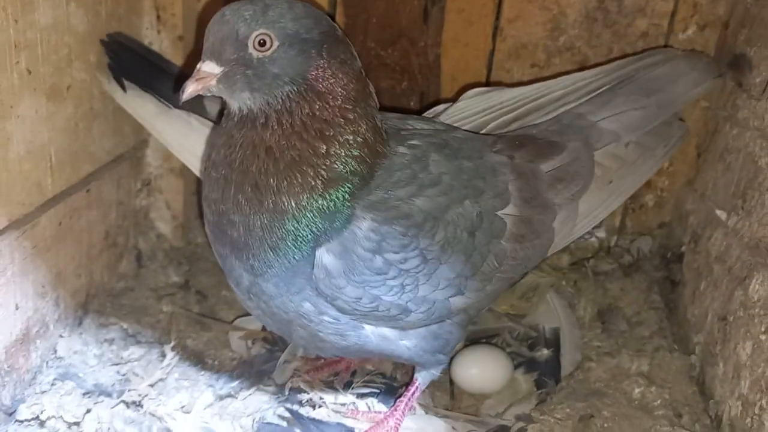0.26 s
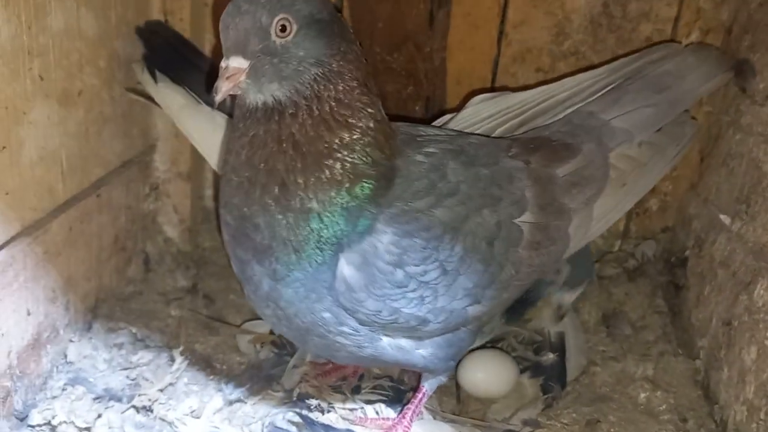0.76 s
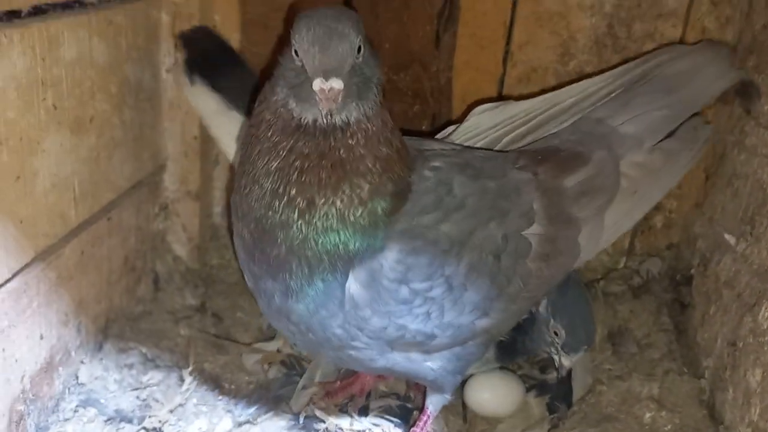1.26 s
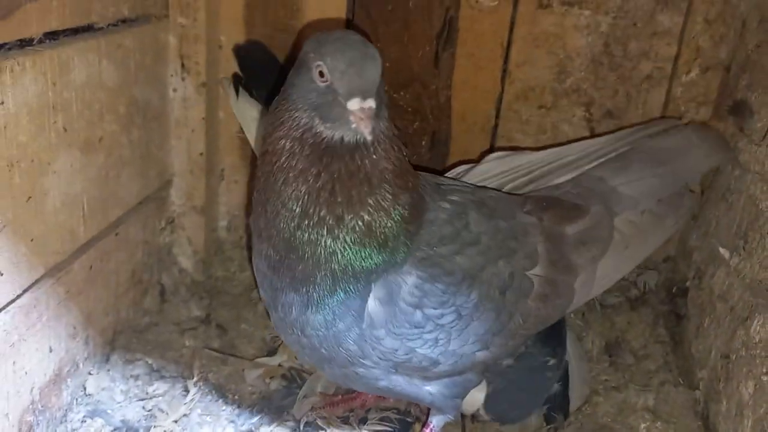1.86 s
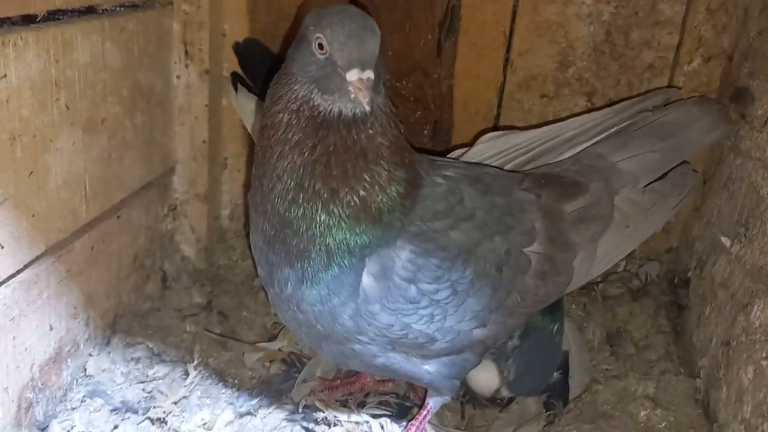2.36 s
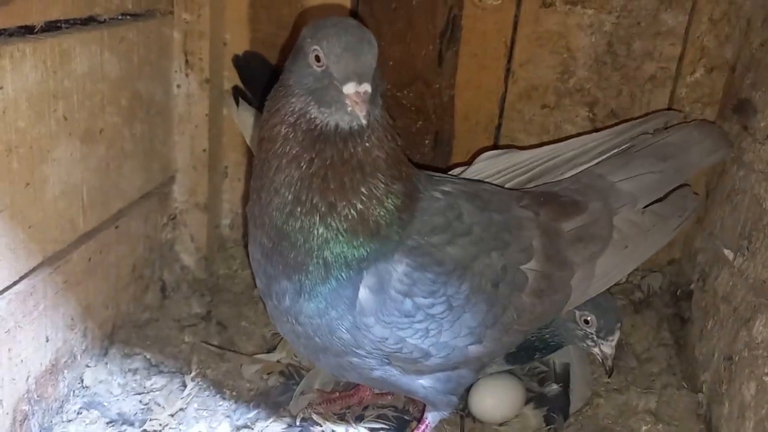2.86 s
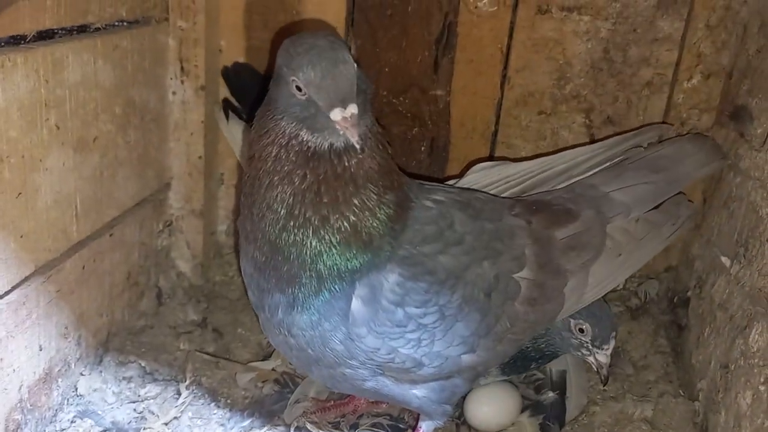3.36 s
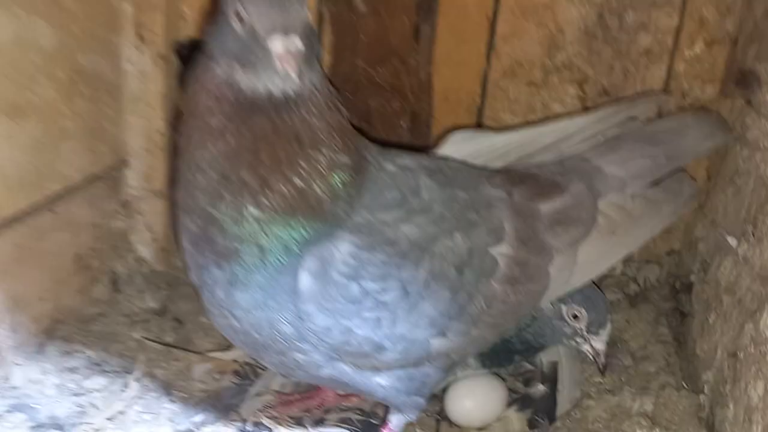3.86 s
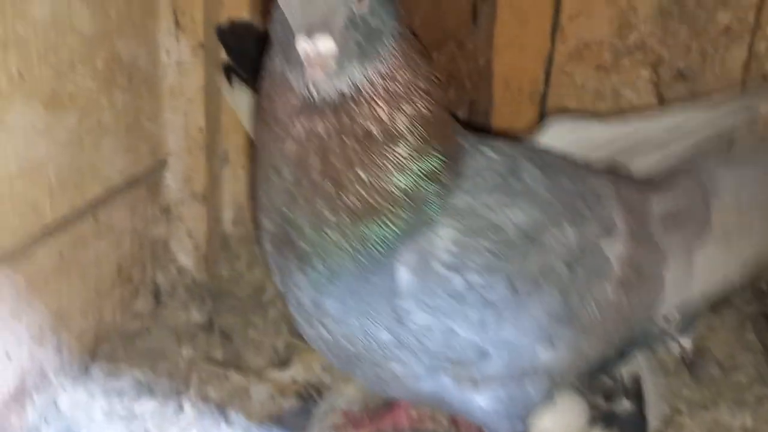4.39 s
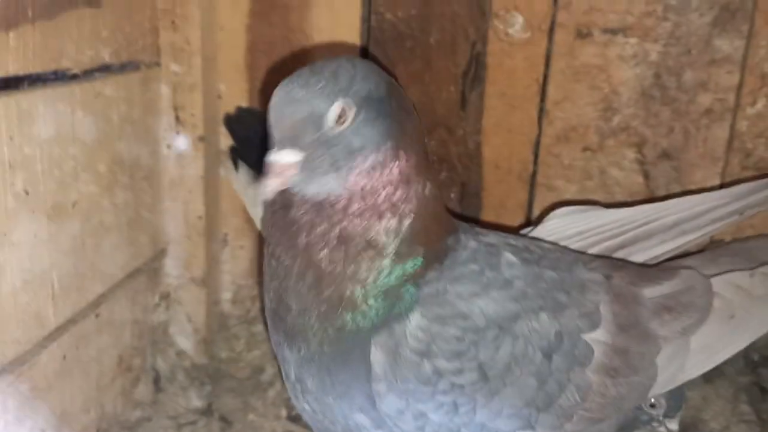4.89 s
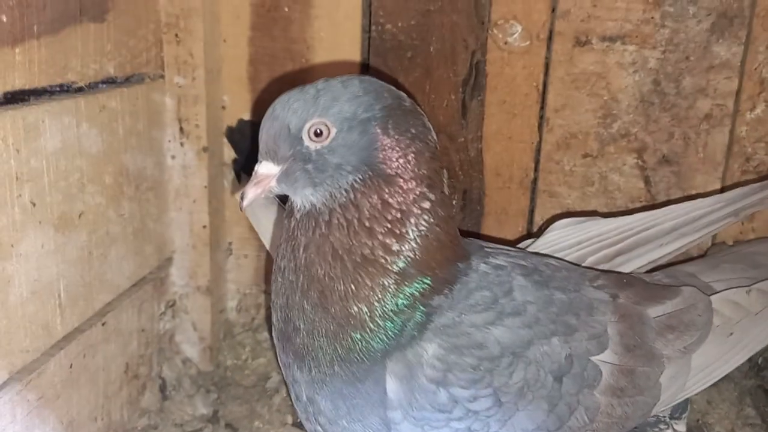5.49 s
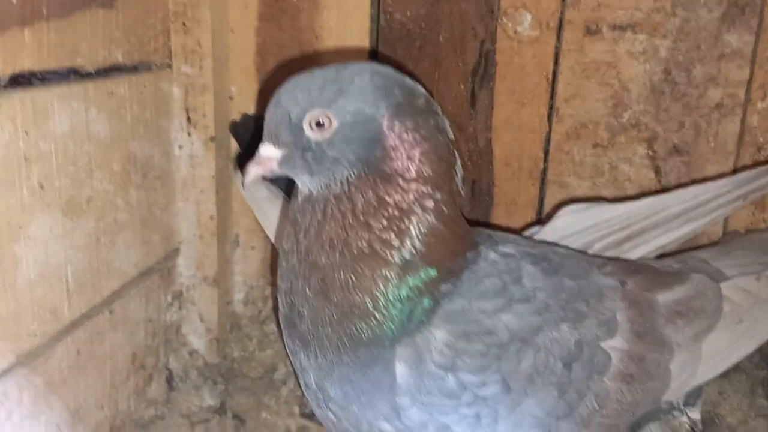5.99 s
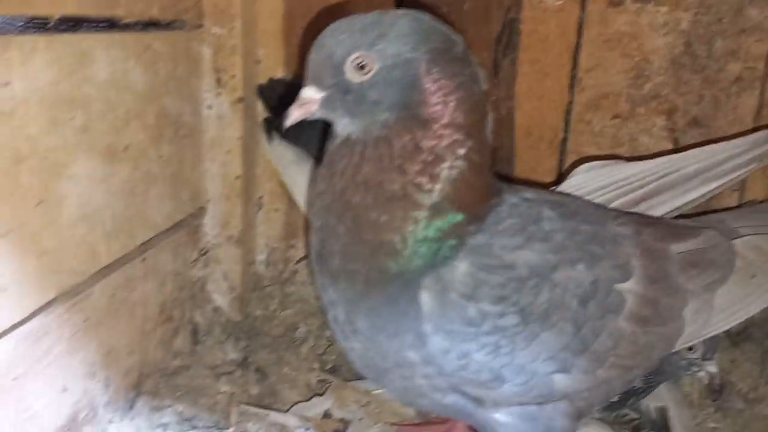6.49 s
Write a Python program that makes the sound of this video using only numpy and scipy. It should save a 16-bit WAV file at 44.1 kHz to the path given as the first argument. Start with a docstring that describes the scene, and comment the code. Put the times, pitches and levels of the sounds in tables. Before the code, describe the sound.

Inside a wooden pigeon loft, a nearby bird gives low, throaty, broken coos while others hum softly farther off. Feet and feathers rustle dry litter, with little ticks and straw snaps. Near the end a loud clack and a stumbling run of wooden thuds burst out, then settle into faint low rumble. Close microphone, sound almost entirely on the right.

```python
"""Pigeons coo in a wooden loft: gliding tones and octaves, roughened by rattle and hoarse noise.
Farther off, two wandering hums and a blurred noise band make the murmur of the flock.
Shaped noise rustles, ticks and crackles as feet and feathers stir the litter. Near the end something
knocks the nest box: noise snaps and ringing modes clack, pressure pulses thud in a stumbling run.
At the microphone nearly all sound is in the right channel; the left has a faint loft echo and hiss."""
import sys
import numpy as np
from scipy import signal
from scipy.fft import rfft, irfft, next_fast_len
from scipy.io import wavfile
from scipy.ndimage import uniform_filter1d, map_coordinates

SR = 44100
rng = np.random.default_rng(int(sys.argv[2]) if len(sys.argv) > 2 else 0)


def persist_wave(psi):
    """Save psi, clipped to +-1, as 16-bit WAV."""
    counts = np.round(np.clip(psi, -1, 1) * 32767).astype(np.int16)
    wavfile.write(sys.argv[1], SR, np.atleast_2d(counts).T)


N = 297234

# Levels are relative, before the gains in the functions; spectra give level per Hz.
# The coos, one list of points each: t/s, pitch f/Hz, fundamental level/dB, octave level/dB, rasp/0-1
COO_GLIDES = [
    [(-.02, 321.4, -67, -68, 1), (.09, 323.4, -62.5, -63.5, 0.75), (.125, 274.6, -75, -66, 0.2),
     (.15, 279.2, -64, -62.5, .3), (.2, 258, -72, -70, 0.26), (.245, 266.3, -64, -67, 0.75),
     (.29, 253.2, -52, -61, 0.5), (.34, 255.5, -53, -58, 0.2), (.36, 249.5, -64, -64, 0.6),
     (.39, 293, -61, -59, 0.5)],
    [(1.06, 350.4, -70.5, -78, 0.5), (1.085, 325.4, -64.5, -67, 0.24), (1.105, 273.6, -76, -65, 0.14),
     (1.13, 261, -70, -57, 0.02), (1.16, 250, -67, -62.5, 0.64), (1.195, 262.5, -73, -53.5, 0),
     (1.225, 258.3, -70, -55, 0.07), (1.245, 253, -72, -68, .2)],
    [(1.72, 255.6, -68, -65, .3), (1.79, 271.6, -61, -64, .4), (1.855, 307.8, -65, -66, .6),
     (1.885, 330.2, -67, -57.5, 0.44), (1.94, 346.5, -62, -59, 0.67), (1.972, 328.8, -70, -62.5, 0.4),
     (2.0, 332.6, -67, -58, .7), (2.04, 272.5, -64, -59, 0.67), (2.11, 272.7, -61, -58, 0.33),
     (2.15, 247, -68, -62.5, 0.34), (2.18, 251, -56, -61, 0.3)],
    [(2.188, 280.4, -57, -58, .6), (2.205, 299, -55, -54, 0.5), (2.22, 269.6, -58, -51, 0.14),
     (2.236, 249.7, -49.5, -54, 0.38), (2.252, 264, -50, -50, 0.1), (2.27, 237, -61, -59, 0.4)],
    [(2.28, 368, -76, -64, 0.5), (2.293, 430, -67, -60, 1), (2.308, 438, -73, -69, 1),
     (2.33, 490, -76, -78, 0.7)],
    [(2.803, 271.6, -59, -62, .4), (2.835, 315, -61, -72, .5), (2.865, 402, -71, -65.5, .5),
     (2.893, 414, -67, -61.5, 0.53), (2.925, 363, -76, -66, .7), (2.965, 370.7, -68, -67.5, 0.95),
     (3.01, 328, -70, -67.5, .7)],
    [(3.51, 270.5, -62, -66, 0.65), (3.6, 279.7, -69, -72, 1), (3.64, 279.5, -68, -65, 0.68),
     (3.668, 265, -69, -69, .5), (3.69, 304.7, -67, -61.5, 0.64), (3.715, 279.7, -70, -65.5, 0.9),
     (3.77, 335, -63.5, -65, 0.87), (3.797, 279, -66, -66.5, 0.4), (3.835, 373, -71, -65, 0.6)],
    [(3.848, 361.5, -61, -61, 0.4), (3.885, 398.3, -69, -64, 0.2), (3.905, 383, -60, -60.5, 0.62),
     (3.93, 426, -66, -62, 0.3), (3.952, 429.5, -65, -61, 0.57), (3.975, 367.4, -65, -63, 0.7),
     (4.015, 405, -69, -67, .3), (4.05, 380, -61, -73, .4)],
    [(5.072, 389, -57, -59, 0.7), (5.1, 360, -68, -68.5, 0.84), (5.16, 343, -82, -72, .4)],
    [(5.552, 354, -72, -56, .4), (5.585, 414, -69, -65.5, .3), (5.605, 375, -64, -56, 0.43),
     (5.63, 378, -60, -61, 0.3), (5.652, 402, -69, -61.5, 0.1), (5.677, 360.6, -59, -59, 1),
     (5.705, 370, -51, -74, 0.6)],
]
# Throat pulses within the coos: middle t/s, swell/dB
THROAT_PULSES = [(.008, 5), (.075, 3), (.152, 5.5), (1.79, 2), (1.828, 5), (1.888, 2.5), (1.939, 3.5),
                 (2.0, 4.5), (2.075, 7), (2.22, 2.5), (2.252, 5), (2.97, 1), (3.001, 6.5), (3.595, 4),
                 (3.638, 6.5), (3.693, 3.5), (3.742, 4), (3.772, 5), (3.803, 3.5), (3.828, 4.5), (3.957, 3),
                 (5.604, 4), (5.675, 4.5)]
# Hoarse band of the coos: f/Hz, level/dB
HOARSE_SPECTRUM = [(150, -31), (280, -7), (380, 3.5), (480, 8), (620, -1.5), (850, -54), (1100, -16.5),
                   (1350, -29.5), (2500, -62)]
PULSE_HALF_S, COO_EDGE_S = 0.0076, 0.0078  # pulse half width; fade at both ends of a coo
# At full rasp: flutter of the level, pitch jitter (share), rattle relative to the octave (share)
COO_THROB_DB, COO_JITTER, COO_RATTLE = 3.8, 0.04, 0.6

# Hums of birds farther off: start t/s, length/s, level/dB
FLOCK_HUMS = [(0.0, 0.12, -64), (0.57, 0.046, -58.5), (0.657, 0.073, -67), (0.813, 0.041, -61),
              (0.977, 0.033, -58.5), (1.193, 0.12, -65), (1.692, 0.24, -58), (2.002, 0.11, -57),
              (2.191, 0.12, -57), (2.562, 0.2, -57.5), (2.824, 0.11, -57), (3.013, 0.3, -56.5),
              (3.477, 0.163, -56), (3.71, 0.31, -70), (4.7, 0.39, -69), (5.243, 0.032, -50),
              (5.491, 0.038, -55.5), (5.678, 0.32, -57)]
# Blurred murmur of the rest of the flock: t/s, level/dB
MURMUR_LEVEL = [(0.0, -65), (0.34, -69.5), (1.73, -71.5), (1.93, -66), (2.1, -76), (2.34, -69), (3.0, -67),
                (3.45, -68.5), (3.8, -61.5), (4.11, -64.5), (4.61, -73.5), (4.87, -57.5), (5.15, -66.5),
                (5.5, -64)]
# Murmur noise band: f/Hz, level/dB
MURMUR_SPECTRUM = [(80, -101), (120, -9.5), (160, -0.5), (215, 6.0), (265, 0.5), (320, -5.5),
                   (420, -3.0), (540, -2.5), (720, -7.0), (1000, -21.5), (2000, -44.0)]
MURMUR_GAIN_DB = 0.5
HUM_REST_DB, HUM_ATTACK_S, HUM_T60_S = -65, 0.013, 0.062

# Steady stirring of the litter: t/s, crunching level/dB, scraping level/dB
LITTER_STIR = [(0.0, -77, -78.5), (0.26, -80, -83.5), (0.62, -73.5, -75), (0.77, -81, -81.5),
               (2.27, -85, -88), (3.57, -72, -75.5), (4.13, -81.5, -77), (4.45, -79, -76.5),
               (4.8, -70.5, -68), (5.07, -74.5, -80), (5.59, -77, -73), (6.1, -62.5, -52.5),
               (6.53, -70, -71.5), (6.74, -72, -70.5)]
# Strokes of feet and feathers: start t/s, length/s, crunching, scraping and brushing level/dB
LITTER_STROKES = [(0.113, 0.03, -84, -66.5, -96), (0.365, 0.038, -62, -71, -83),
                  (0.431, 0.039, -58.5, -64.5, -71), (0.586, 0.01, -56.5, -65, -62.5),
                  (0.708, 0.032, -61.5, -80, -61.5), (1.217, 0.068, -73, -70.5, -91),
                  (1.345, 0.017, -73, -75, -94), (2.535, 0.056, -75.5, -74, -79),
                  (2.648, 0.09, -73.5, -71, -74.5), (2.917, 0.14, -76.5, -73, -92),
                  (3.176, 0.084, -67.5, -65.5, -78), (3.407, 0.0073, -72, -93, -59),
                  (3.433, 0.15, -98, -72.5, -72), (3.656, 0.045, -63.5, -72, -60.5),
                  (4.267, 0.093, -92, -75, -102), (4.597, 0.08, -69, -66, -63), (4.77, 0.15, -81, -66, -67),
                  (5.212, 0.0092, -86, -66, -66), (5.307, 0.042, -78, -69, -75),
                  (5.566, 0.35, -76.5, -71, -67.5), (5.833, 0.027, -61, -59, -72),
                  (5.902, 0.025, -57, -54, -62), (5.919, 0.013, -48, -46, -51),
                  (5.991, 0.041, -51.5, -61, -56.5), (6.051, 0.01, -69, -41.5, -72),
                  (6.164, 0.035, -58, -53, -53)]
# Crunching litter: f/Hz, level/dB
CRUNCH_SPECTRUM = [(1800, -5.5), (2700, -7.5), (3600, -1), (6900, 2.5), (8300, -7), (11000, -7)]
# Scraping feet: f/Hz, level/dB
SCRAPE_SPECTRUM = [(150, -22), (350, 11.5), (700, 4.5), (1100, 4.5), (1900, 1.5), (2600, -10.5),
                   (3500, -11), (6000, -21)]
# Brushing feathers: f/Hz, level/dB
BRUSH_SPECTRUM = [(5500, -7.5), (8300, -4), (11000, 1), (13500, -5), (16000, -10.5)]
STIR_CRUNCH_DB, STIR_SCRAPE_DB, STIR_BRUSH_DB = 1, -0.5, -5  # gains; brushing follows crunching
STROKE_ATTACK_S, STROKE_T60_S = 0.0084, 0.16
SLIP_GRAIN_DB = 3.2
# Straws snapping: t/s, pitch f/Hz, level/dB
STRAW_SNAPS = [(0.26, 6670, -62), (0.341, 3650, -64), (0.803, 6040, -71), (0.963, 7000, -74),
               (1.029, 7550, -65.5), (1.491, 6600, -68), (2.295, 4840, -63), (2.533, 4230, -59),
               (2.541, 4200, -66), (2.5605, 4150, -57), (2.573, 4330, -62), (3.8493, 5100, -59.5)]

# Weight shifting on the box: middle t/s, half length/s, level/dB
BOX_LOADS = [(2.61, 0.044, -57), (2.995, 0.061, -57), (3.873, 0.057, -63), (4.202, 0.056, -67.5),
             (4.38, 0.028, -68), (4.72, 0.066, -55.5), (4.924, 0.073, -51), (5.273, 0.1, -67),
             (5.85, 0.2, -58.5), (6.144, 0.14, -30.5), (6.67, 0.42, -49.5)]
# Rumble of the box: f/Hz, level/dB
RUMBLE_SPECTRUM = [(20, -29), (40, -8), (72, -7), (115, 1), (170, -6.5), (270, -13.5), (500, -41),
                   (900, -60), (2000, -72)]
# Judder of the boards: f/Hz, level/dB
JUDDER_SPECTRUM = [(150, -21), (260, 5.0), (480, -5.5), (650, -7.5), (1200, -56), (3000, -58)]
SHUDDER_REST_DB = -72.5  # level before gain, box at rest

# Claws and beaks ticking: t/s, tap pitch f/Hz, wood level/dB, litter level/dB
CLAW_TICKS = [(0.067, 865, -50, -60), (0.1193, 1970, -49.5, -58.5), (0.382, 1620, -57, -55.5),
              (0.594, 2320, -61, -70), (1.1945, 1330, -51, -69.5), (1.413, 804, -79, -60),
              (1.732, 840, -52.5, -61), (2.197, 1300, -65, -72), (2.283, 800, -61, -65),
              (2.4703, 1390, -96, -64.5), (2.54, 717, -46.5, -63), (2.572, 1390, -57.5, -61),
              (2.6803, 1430, -55, -58), (2.9916, 714, -56, -58), (3.215, 1900, -59, -57),
              (3.256, 1400, -63, -82), (3.407, 1350, -81, -55.5), (3.68, 1950, -46, -42.5),
              (4.133, 1930, -50, -69.5), (4.253, 1530, -52, -67), (4.387, 1660, -60.5, -70),
              (4.518, 1400, -59.5, -65.5), (4.8439, 1350, -64, -58), (4.9008, 1370, -50, -61),
              (5.0693, 1400, -54.5, -52), (5.142, 1350, -73, -59.5), (5.389, 1170, -57, -55.5),
              (5.698, 1690, -50.5, -58.5), (6.024, 3130, -39, -53), (6.2075, 3400, -43.5, -60),
              (6.411, 1430, -56.5, -48.5), (6.5206, 1350, -69, -60), (6.617, 1440, -49.5, -50)]
# Wood under a tick: frequency/multiple of tap pitch, level/dB
TICK_WOOD_SPECTRUM = [(.22, 6), (.6, -6.5), (1, 9.5), (1.35, -8), (1.9, -13.5), (4.4, -58)]
# Litter under a tick: f/Hz, level/dB
TICK_LITTER_SPECTRUM = [(1500, -69), (2700, -15), (3700, -7.5), (6500, 0), (8500, -10), (15000, -14.5)]
TICK_T60_S = 0.058

# Short clucks: middle t/s, pitch f/Hz, half length/s, level/dB, octave level re fundamental/dB
CLUCK_NOTES = [(0.776, 335, .012, -70.5, 7.5), (.828, 365, 0.014, -60, 4.5),
               (0.883, 390, 0.013, -57.5, 0.5), (0.897, 443, 0.028, -57.5, -26),
               (1.671, 237.9, 0.08, -54.5, -30), (2.666, 248.5, 0.023, -51.5, -28),
               (2.897, 438, .026, -53.5, -19), (3.896, 444, 0.025, -57, -24), (5.184, 443, .05, -58.5, -43),
               (5.606, 422, 0.017, -55, -16), (5.852, 448, 0.028, -47, -34)]

# Hard clacks on the box: t/s, level/dB, ring level re clack/dB
BOX_CLACKS = [(4.7221, -31, -16), (5.9214, -14, 0), (6.0530, -14.5, -22), (6.3140, -19, -15),
              (6.4518, -20.5, -35.5)]
# Noise of a clack: f/Hz, level/dB
CLACK_SPECTRUM = [(180, -30), (300, 0), (678, -11), (1810, -8), (2070, -8), (2740, -15.5), (3030, -9),
                  (3890, -10.5), (8790, -15.5), (11900, -12), (16000, -18)]
# Ringing modes of the striking piece: f/Hz, level/dB, 60 dB decay/s
STRIKER_MODES = [(1044, -11, 0.077), (1350, -18, 0.075), (2070, 6.5, 0.026), (4520, 3, 0.021),
                 (5860, 7, 0.028), (6750, 13, 0.011), (8080, 6.5, 0.02), (8900, 11.5, 0.014),
                 (10000, 12.5, 0.013)]

# Soft blows on the boards: t/s, level/dB, hardness f/Hz
BOARD_BLOWS = [(4.734, -48.5, 65), (4.906, -45, 60), (6.038, -35, 121), (6.111, -20, 120),
               (6.261, -25.5, 130), (5.933, -25.5, 113), (5.976, -32, 114), (5.996, -27, 183),
               (6.012, -20, 168), (6.049, -26, 129), (6.071, -21, 188), (6.086, -22, 233),
               (6.1031, -13, 167), (6.122, -26.5, 394), (6.14, -19.5, 330), (6.151, -16.5, 268),
               (6.178, -16, 172), (6.192, -22, 110), (6.2041, -18, 234), (6.217, -31, 180),
               (6.245, -29, 248), (6.28, -30.5, 262), (6.296, -25, 159), (6.35, -26.5, 70),
               (6.439, -35.5, 60), (6.572, -41, 59.5), (6.66, -35, 55), (6.701, -32.5, 55)]
# Ringing modes of the boards: nominal f/Hz, level/dB, 60 dB decay/s
BOARD_MODES = [(75.2, -3, 0.22), (106, 4, 0.1), (182, -0.5, 0.054), (260, 1.5, 0.044), (394, -2, 0.023),
               (461, -3, 0.039), (670, -28, 0.041), (1010, -29.5, .034)]

# Wood squeaking under load: middle t/s, pitch f/Hz, half length/s, level/dB
JOINT_SQUEAKS = [(5.853, 737, 0.033, -52.5), (5.981, 696, 0.035, -50.5)]
# Harmonics of a squeak: frequency/multiple of pitch, level/dB
SQUEAK_HARMONICS = [(1, -1.5), (2, -6), (3, -9), (4, -11.5)]
SQUEAK_JITTER, SQUEAK_FLUTTER_DB = 0.06, 3.5  # pitch jitter as a share

# Decay of the wooden loft: f/Hz, 60 dB decay/s
LOFT_DECAY = [(100, 0.24), (300, 0.23), (1000, 0.28), (5000, 0.095), (14000, 0.027)]
# Steady hiss: f/Hz, level/dB
HISS_SPECTRUM = [(20, 0.5), (70, -7.5), (170, -13), (500, -22), (1000, -27.5), (5500, -36.5), (8500, -32),
                 (11000, -35), (14500, -29)]
TOP_HZ = 15900


def amp(db):
    """Decibels to amplitude gain."""
    return 10 ** (np.asarray(db) / 20)


def unit(x):
    """Scale to rms 1."""
    return x / np.sqrt(np.mean(x ** 2) + 1e-20)


def along(points, hz):
    """Read (f/Hz, value) points on a log frequency axis."""
    f, values = np.transpose(points)
    return np.interp(np.log(hz + 1), np.log(f + 1), values)


def curves(rows):
    """One value per sample for each column after the time."""
    times, *columns = np.transpose(rows)
    return [np.interp(np.arange(N) / SR, times, column) for column in columns]


def wobble(rate):
    """A smooth random curve with rate knots a second."""
    knots = rng.standard_normal(int(N * rate / SR) + 4)
    return map_coordinates(knots, [np.arange(N) * rate / SR])


def filtered(x, response):
    """Apply a frequency response to x."""
    n = x.shape[-1]
    m = next_fast_len(n + 8192)  # room for the filter tail
    return irfft(rfft(x, m) * response(np.fft.rfftfreq(m, 1 / SR)), m)[..., :n]


def coloured(x, spectrum):
    """Weight x by a spectrum and scale it to rms 1."""
    return unit(filtered(x, lambda hz: amp(along(spectrum, hz))))


def add(track, s, sound):
    """Mix a sound into the track from time s."""
    start = max(round(s * SR), 0)
    track[start:start + len(sound)] += sound[:max(N - start, 0)]


def fade(t, t60):
    """A decay of 60 dB in t60 seconds."""
    return np.exp(-np.log(1000) * t / max(t60, .001))


def patchy(x, depth_db):
    """Shifting contact points lend x resonances that change from moment to moment."""
    z = signal.stft(x, nperseg=256)[2]
    across_pitch = uniform_filter1d(rng.standard_normal(z.shape), 4, 0)
    field = uniform_filter1d(across_pitch, 9, 1)
    return signal.istft(z * amp(depth_db * unit(field)), nperseg=256)[1][:len(x)]


def stroke(start, length, attack, t60):
    """An envelope that rises, holds until start + length and dies away."""
    t = np.arange(N) / SR - start
    return np.clip(t / max(attack, .001), 0, 1) * fade(np.clip(t - length, 0, 1), t60)


def coos(rattle_hz=150, third_db=-21, hoarse_db=-2, pulse_lift=0.041):
    """Tone and octave glide in throat-pulsed syllables; rasp adds a rattle below the octave and breath."""
    t, out = np.arange(N) / SR, np.zeros(N)
    shake, throb = wobble(130), wobble(90)
    flap = 2 * np.pi * np.cumsum(rattle_hz * (1 + 0.25 * wobble(40))) / SR
    hoarse = coloured(rng.standard_normal(N), HOARSE_SPECTRUM)
    push_db = sum(db * np.exp(-((t - s) / PULSE_HALF_S) ** 2) for s, db in THROAT_PULSES)
    for coo in COO_GLIDES:
        times, *controls = np.transpose(coo)
        on = (t > times[0]) & (t < times[-1])
        pitch, low_db, high_db, rasp = [np.interp(t[on], times, c) for c in controls]
        # Each push lifts the pitch as well as the level.
        lift = pulse_lift * push_db[on] / push_db.max()
        pitch = pitch * (1 + COO_JITTER * rasp * shake[on] + lift)
        phase = 2 * np.pi * np.cumsum(pitch) / SR
        rattle = COO_RATTLE * np.sin(2 * phase - flap[on]) + amp(hoarse_db) * hoarse[on]
        upper = np.sin(2 * phase) + amp(third_db) * np.sin(3 * phase) + rasp * rattle
        voice = np.sqrt(2) * (amp(low_db) * np.sin(phase) + amp(high_db) * upper)
        gate = np.clip(np.minimum(t[on] - times[0], times[-1] - t[on]) / COO_EDGE_S, 0, 1)
        out[on] += gate * voice * amp(push_db[on] + COO_THROB_DB * rasp * throb[on])
    return out


def flock(pitch_hz=236, drift=0.072, octave_db=-22, blur_db=-13, count=2):
    """Farther birds hum around one pitch and beat together, over a blurred noise band of murmur."""
    hum = np.zeros(N)
    for _ in range(count):
        pitch = pitch_hz * (1 + drift * wobble(16) + 0.04085 * wobble(70))
        phase = 2 * np.pi * np.cumsum(pitch) / SR
        hum += amp(5.3 * wobble(22)) * (np.sin(phase) + amp(octave_db) * np.sin(2 * phase))
    # Even out the running level before shaping the calls.
    hum /= np.sqrt(np.abs(uniform_filter1d(hum ** 2, SR // 8)) + 1e-9)
    blur = coloured(rng.standard_normal(N), MURMUR_SPECTRUM)
    power = amp(HUM_REST_DB) ** 2
    for s, length, db in FLOCK_HUMS:
        power = power + (amp(db) * stroke(s, length, HUM_ATTACK_S, HUM_T60_S)) ** 2
    level = np.sqrt(power)
    murmur_level = amp(curves(MURMUR_LEVEL)[0] + MURMUR_GAIN_DB) + amp(blur_db) * level
    return level * hum + murmur_level * blur


def movement():
    """Strength of crunching, scraping and brushing: powers of steady stirring and strokes add."""
    crunch_db, scrape_db = curves(LITTER_STIR)
    stir_db = [crunch_db + STIR_CRUNCH_DB, scrape_db + STIR_SCRAPE_DB, crunch_db + STIR_BRUSH_DB]
    power = amp(stir_db) ** 2
    for s, length, *levels_db in LITTER_STROKES:
        envelope = stroke(s, length, STROKE_ATTACK_S, STROKE_T60_S)
        power += np.outer(amp(levels_db), envelope) ** 2
    return np.sqrt(power)


def rustle(crunch, scrape, brush, clump_db=2.0, patchy_db=2.5):
    """Feet crunch and scrape the litter and feathers brush the boards, in clumps of tiny slips."""
    clumps = clump_db * wobble(45)

    def slips(spectrum):
        """Grainy friction noise of one contact; all three share the clumps."""
        noise = patchy(rng.standard_normal(N), patchy_db)
        return coloured(noise * amp(clumps + SLIP_GRAIN_DB * wobble(700)), spectrum)

    crunching = amp(-1.0) * crunch * slips(CRUNCH_SPECTRUM)
    scraping = amp(3.5) * scrape * slips(SCRAPE_SPECTRUM)
    return crunching + scraping + brush * slips(BRUSH_SPECTRUM)


def snap(hz, t60, octaves):
    """One dry snap: a decaying burst of noise around a pitch."""
    t = np.arange(SR // 25) / SR
    noise = rng.standard_normal(len(t))
    burst = filtered(noise, lambda f: 1 / (1 + (np.log2((f + 1) / hz) / octaves) ** 2))
    return unit(burst) * fade(t, t60)


def crackle(crunch, rate=70, spread_db=3, life=0.036, level_db=-2, most_db=-66):
    """Crumbs and quills snap at random, louder with the crunching up to a cap; straws snap underfoot."""
    out = np.zeros(N)
    stir = np.minimum(crunch, amp(most_db))
    for place, size, pitch in rng.random((int(rate * N / SR), 3)):
        db = level_db + spread_db * min(-np.log(1 - size), 3)
        crumb = snap(3000 * 3 ** pitch, life, octaves=0.63)
        add(out, place * N / SR, stir[int(place * N)] * amp(db) * crumb)
    for s, hz, db in STRAW_SNAPS:
        add(out, s, amp(db) * snap(hz, t60=0.037, octaves=0.23))
    return out


def shudder(judder_db=-8, lumps_db=3, lumps_per_s=45):
    """Weight drags on the box in lumps and it rumbles; the hardest dragging makes the boards judder."""
    t = np.arange(N) / SR
    loads = sum(amp(db) * np.exp(-((t - s) / half) ** 2) for s, half, db in BOX_LOADS)
    force = amp(SHUDDER_REST_DB) + loads
    rumble = coloured(rng.standard_normal(N), RUMBLE_SPECTRUM)
    judder = coloured(rng.standard_normal(N), JUDDER_SPECTRUM)
    lumps = amp(lumps_db * wobble(lumps_per_s))
    return force * lumps * (amp(-4.5) * rumble + amp(judder_db) * force / force.max() * judder)


def ticks(attack=0.0018, patchy_db=2):
    """Each small contact taps the wood and crunches the litter on it, with a colour of its own."""
    out, t = np.zeros(N), np.arange(SR // 4) / SR
    envelope = fade(t, TICK_T60_S) * (1 - np.exp(-t / attack))
    for s, tap_hz, tap_db, crunch_db in CLAW_TICKS:
        wood = [(k * tap_hz, db) for k, db in TICK_WOOD_SPECTRUM]
        tap = coloured(patchy(rng.standard_normal(len(t)), patchy_db), wood)
        crunch = coloured(patchy(rng.standard_normal(len(t)), patchy_db), TICK_LITTER_SPECTRUM)
        add(out, s, (amp(tap_db) * tap + amp(crunch_db) * crunch) * envelope)
    return out


def clucks(arch=0.099, rough=0.27):
    """Brief notes of a tone and its octave, whose pitch arches up and down."""
    out, grain = np.zeros(N), 1 + rough * wobble(200)
    for s, hz, length, db, octave_db in CLUCK_NOTES:
        swell = np.hanning(int(2 * length * SR))
        phase = 2 * np.pi * np.cumsum(hz * (1 + arch * (swell - 1))) / SR
        note = np.sin(phase) + amp(octave_db) * np.sin(2 * phase)
        add(out, s - length, amp(db + 5.0) * swell ** 2 * note)
    return out * grain


def clacks(snap_t60=0.0034, tail_t60=0.065, tail_db=-7, ring_db=-11, ping_db=5, ping_hz=9700):
    """A hard noise snap, a short rattle of the box and decaying modes of the striking piece."""
    out, t = np.zeros(N), np.arange(SR // 4) / SR
    for s, db, bright_db in BOX_CLACKS:
        decay = fade(t, snap_t60) + amp(tail_db) * fade(t, tail_t60)
        crack = coloured(rng.standard_normal(len(t)), CLACK_SPECTRUM) * decay
        ring = np.zeros(len(t))
        for hz, level, t60 in STRIKER_MODES:
            tone = np.sin(2 * np.pi * (hz * t + rng.random()))
            ring += amp(level + 2 * rng.standard_normal()) * fade(t, t60) * tone
        ping = fade(t, 0.013) * np.sin(2 * np.pi * ping_hz * t)
        ringing = amp(bright_db) * (amp(ring_db) * ring + amp(ping_db) * ping)
        add(out, s, amp(db - 9.5) * (crack + ringing))
    return out


def thuds(ring_db=-11, reach=1.8):
    """Each blow shoves the boards out and back once; harder ones ring the higher modes more."""
    out, t = np.zeros(N), np.arange(SR // 3) / SR
    for s, db, hard_hz in BOARD_BLOWS:
        u = 2 * np.pi * hard_hz * (t - t.mean())
        add(out, s - t.mean(), amp(db) * u * np.exp(-u ** 2 / 2))
        ring = np.zeros(len(t))
        for hz, level, t60 in BOARD_MODES:
            drive = amp(level + rng.normal(0, 3.8)) / np.hypot(1, (hz / (reach * hard_hz)) ** 2)
            tone = np.sin(2 * np.pi * hz * (1 + rng.normal(0, 0.063)) * t)
            ring += drive * fade(t, t60) * tone
        add(out, s, amp(db + ring_db) * ring * (1 - np.exp(-t / 0.0015)))
    return out


def squeaks(arch=0.053, rise=0.055):
    """A loaded joint slips fast enough to sing for an instant, unevenly and rising a little."""
    out = np.zeros(N)
    for s, hz, length, db in JOINT_SQUEAKS:
        swell = np.hanning(int(2 * length * SR))
        n = len(swell)
        glide = 1 + arch * (swell - 1) + rise * np.linspace(-1, 1, n)
        phase = 2 * np.pi * np.cumsum(hz * (glide + SQUEAK_JITTER * wobble(1100)[:n])) / SR
        tone = np.zeros(n)
        for k, level in SQUEAK_HARMONICS:
            tone += amp(level + SQUEAK_FLUTTER_DB * wobble(243)[:n]) * np.sin(round(k) * phase)
        add(out, s - length, amp(db + 7.0) * swell ** 2 * tone)
    return out


def loft(x):
    """The short answer of the wooden walls: decaying noise, dying faster in the treble."""
    hz, t, z = signal.stft(rng.standard_normal(SR // 2), SR, nperseg=256)
    decay = np.exp(-np.log(1000) * t / along(LOFT_DECAY, hz)[:, None])
    tail = signal.istft(z * decay, SR, nperseg=256)[1]
    answer = np.pad(tail / np.linalg.norm(tail), (SR // 300, 0))  # walls answer after 1/300 s
    return signal.fftconvolve(x, answer)[:N]


def scene():
    """Birds and box reach the right channel; the left holds a trace of them and faint hiss."""
    voices = coos() + clucks()
    contacts = clacks() + thuds() + squeaks()
    crunch, scrape, brush = movement()
    litter = rustle(crunch, scrape, brush) + crackle(crunch) + ticks()
    echo = loft(amp(-16.0) * voices + amp(-15.5) * contacts)
    sound = voices + contacts + litter + echo + flock() + shudder()
    hiss = coloured(rng.standard_normal((2, N)), HISS_SPECTRUM)
    left = amp(-47.0) * loft(sound) + amp(-76.5) * hiss[0]
    right = amp(5.0) * sound + amp(-84.0) * hiss[1]
    return np.array([left, right])


def record(dry, low_cut_hz=44):
    """The microphone loses the deepest bass, and nothing is kept above the band limit."""
    return filtered(dry, lambda hz: (hz < TOP_HZ) / np.sqrt(1 + (low_cut_hz / (hz + 1)) ** 10))


dry = scene()
out = record(dry)
persist_wave(out)
```